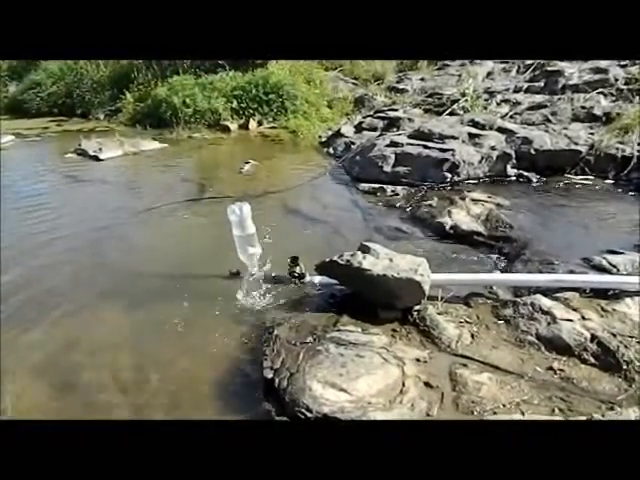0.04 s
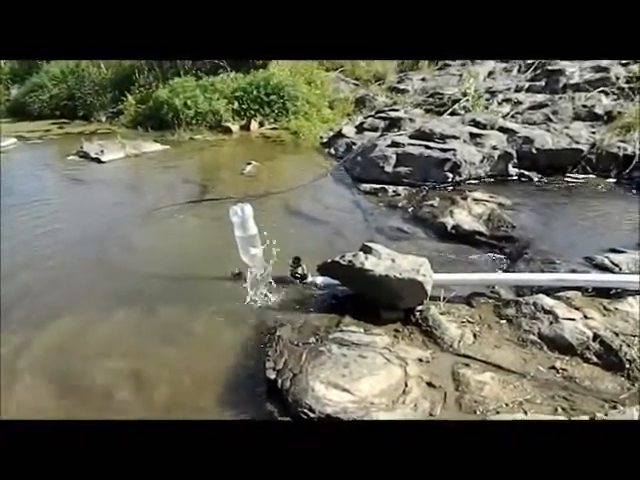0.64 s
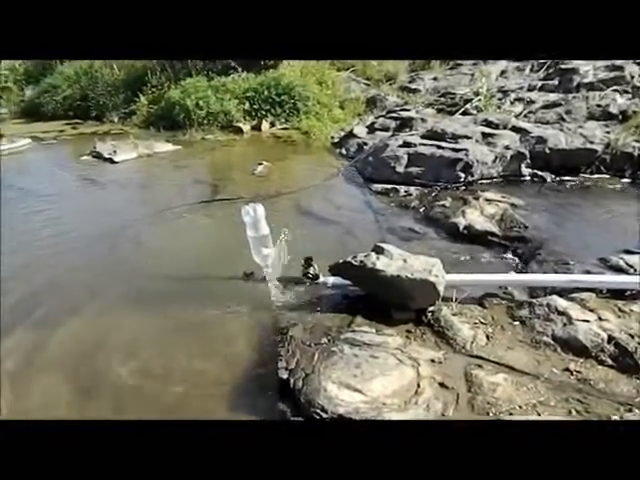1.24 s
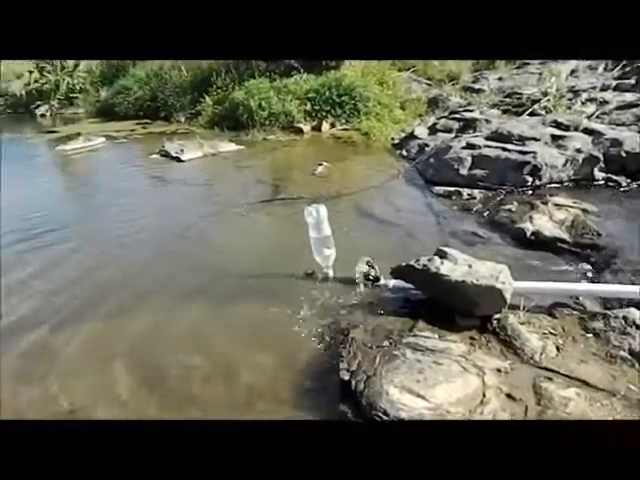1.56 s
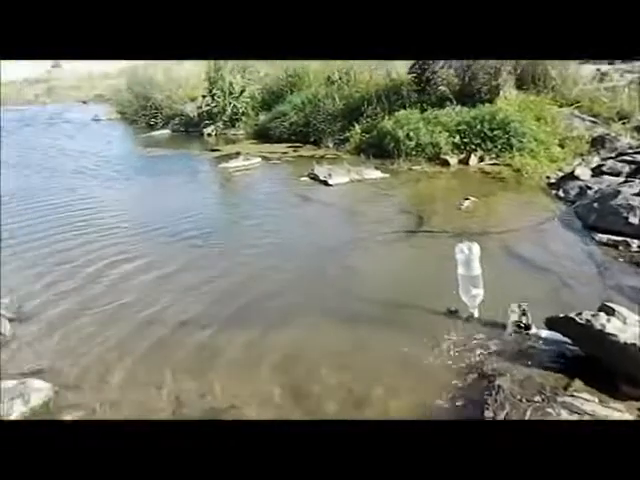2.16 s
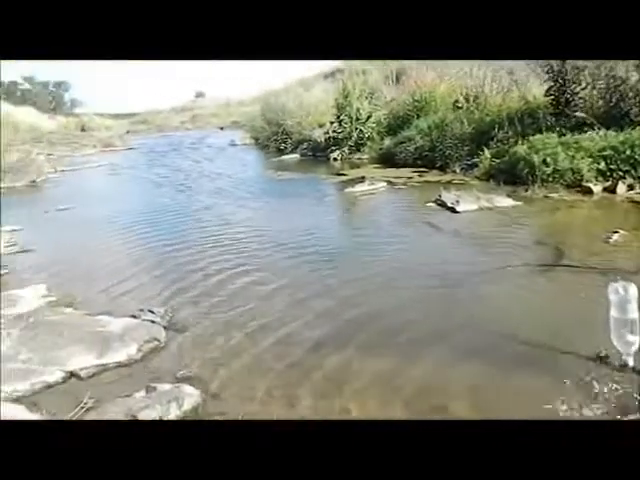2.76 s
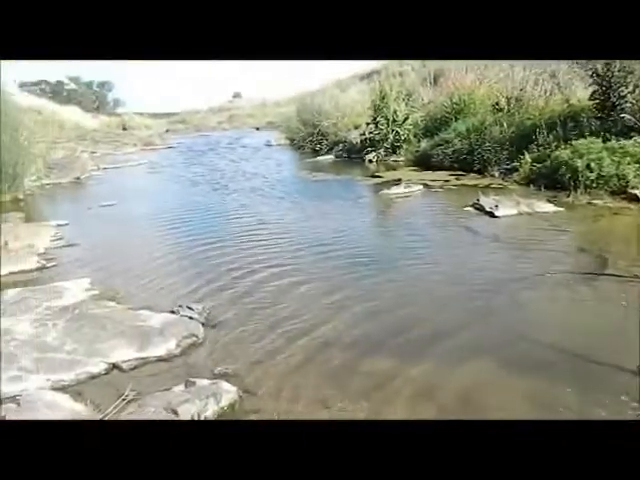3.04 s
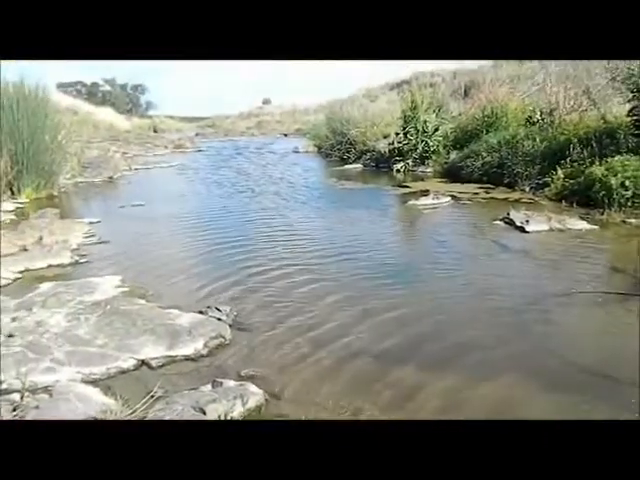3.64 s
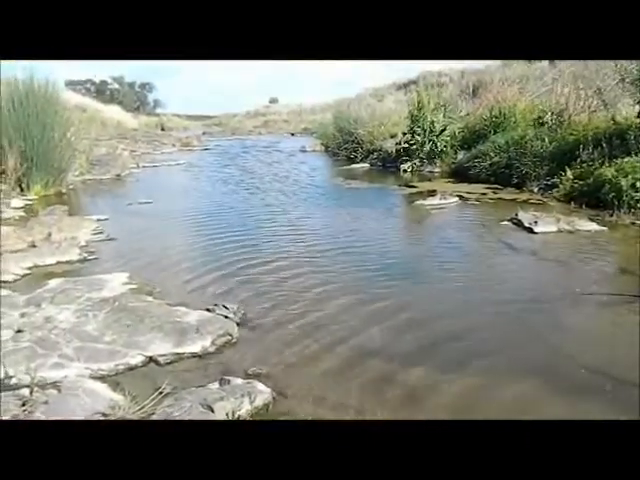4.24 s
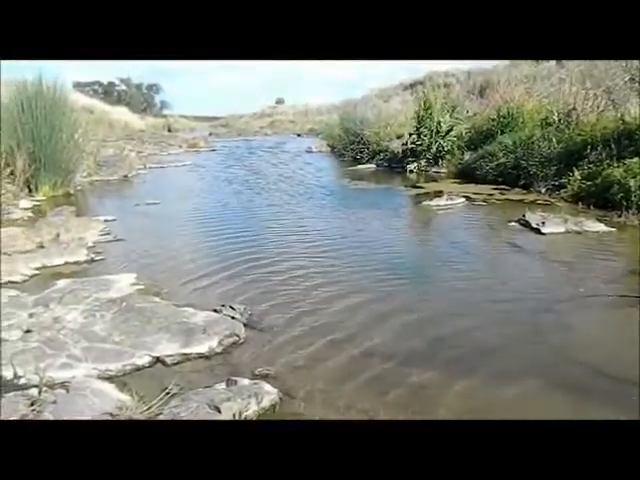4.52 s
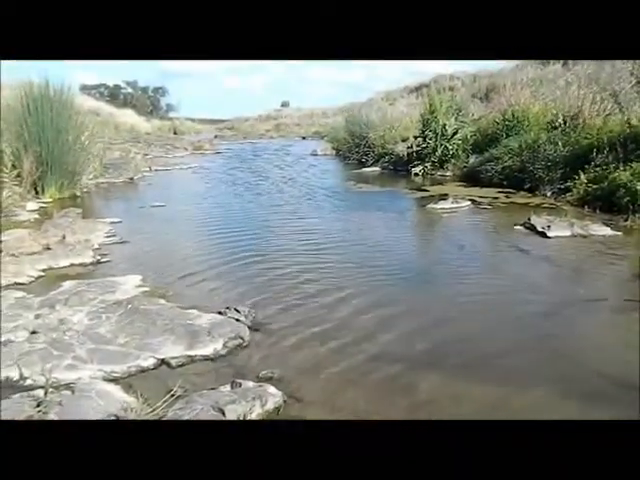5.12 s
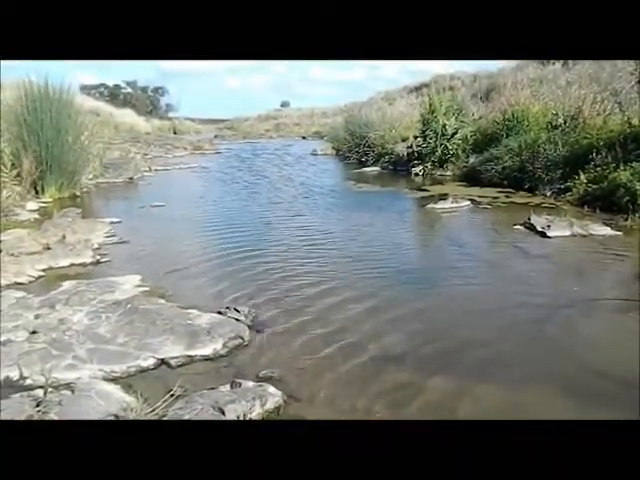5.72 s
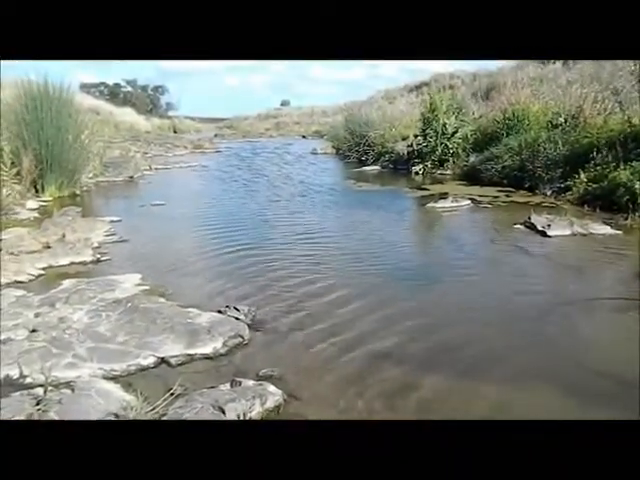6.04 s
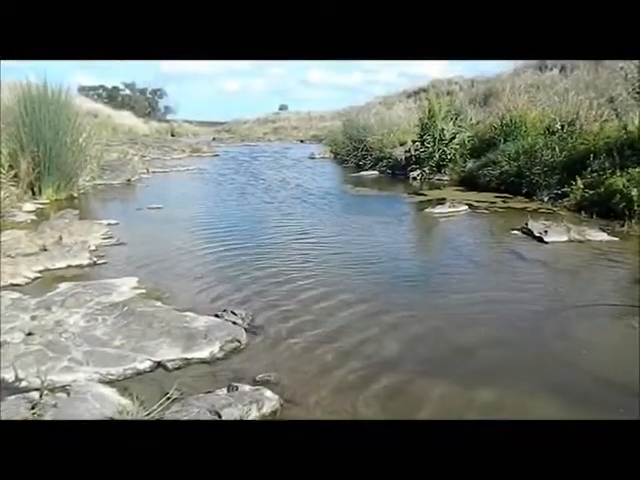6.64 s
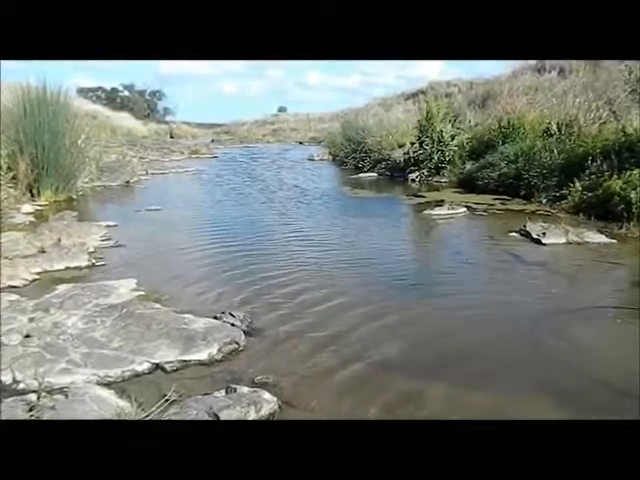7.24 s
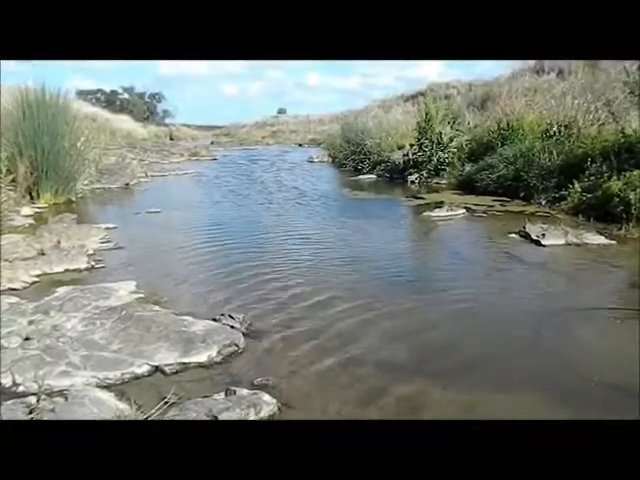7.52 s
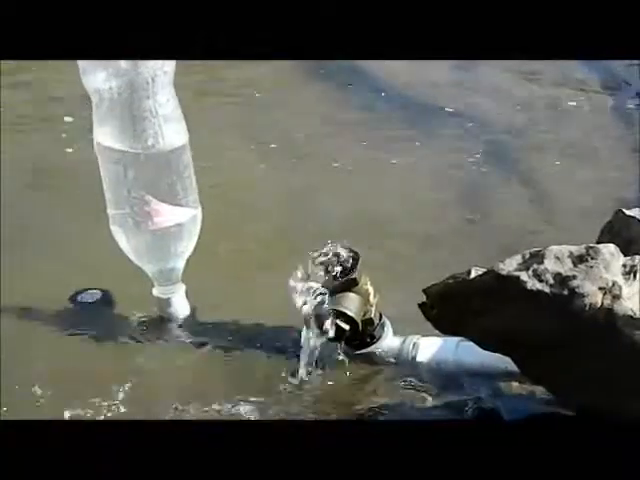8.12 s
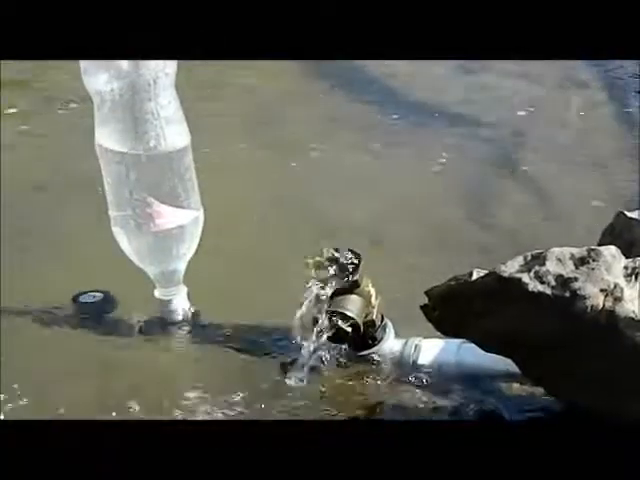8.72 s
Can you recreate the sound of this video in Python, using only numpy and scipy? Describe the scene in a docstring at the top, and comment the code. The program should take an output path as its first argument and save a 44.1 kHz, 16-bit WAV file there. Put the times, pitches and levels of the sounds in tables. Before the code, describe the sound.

A home-made water pump clacks steadily, about three times every two seconds, its metal valve slamming with a brief hiss and a knock in the pipe. Water spills into a creek pool after each stroke, bubbling and splashing softly. Wind thumps and rumbles on the microphone in uneven gusts, pushing the other sounds down. Late on, the sound drops out for an instant, then one last clack comes amid heavier wind.

```python
"""At a creek, a home-made water pump (a hydraulic ram) slams its brass valve shut about every 0.62 s.
Each slam stops the water in the pipe with a knock, and the valve drops open again with a faint tink.
Between slams, water spills from the valve and splashes into the pool, bubbling and dripping.
Gusts of wind rumble on the microphone and turn the whole sound down; late on, the level dips briefly."""
import sys
import numpy as np
from scipy import signal
from scipy.fft import rfft, irfft, next_fast_len
from scipy.io import wavfile
from scipy.ndimage import uniform_filter1d, map_coordinates

SR = 44100
rng = np.random.default_rng(int(sys.argv[2]) if len(sys.argv) > 2 else 0)


def inscribe(sig):
    """Save sig as 16-bit PCM at rate SR to the path in sys.argv[1].

    A 1-D sig is mono; a 2-D sig holds one channel per row.
    Samples are clipped to [-1, 1] before scaling.
    """
    pcm = np.round(np.clip(np.atleast_2d(sig).T, -1, 1) * 32767)
    wavfile.write(sys.argv[1], SR, pcm.astype(np.int16))


N = 396018

# each slam of the valve: (time [s], level [dB], extra level of the pipe's knock [dB], ping pitch [Hz])
SLAMS = [(0.568, -9.5, 1, 5470), (1.1897, -9, -18, 5450), (1.8118, -7, 3, 7200), (2.4429, -11.5, -27, 7060),
         (3.084, -12, 0, 7080), (3.715, -13, 4.5, 7150), (4.3384, -15.5, 6, 7400), (4.9585, -13, 5, 7080),
         (5.5776, -15.5, -13, 7300), (6.1945, -13, 5, 6370), (6.809, -11, 3, 7260), (7.4327, -13, 4, 7120),
         (8.3803, -14, 10, 5680)]


def valve(rise_s=0.0016, hold_s=0.0023, slam_db=-3, jet_db=-17, tail_db=-14, ping_db=-11):
    """Water hisses through the closing gap, the flap rattles shut and pings, and spray trails off."""
    jet_t60, tail_t60, ping_t60 = 0.095, 0.13, 0.017  # a t60 is the seconds taken to fade by 60 dB
    lead_s = 0.05  # the hiss starts before the flap hits
    t = np.arange(SR // 4) / SR - lead_s
    after = np.maximum(t, 0)
    blow = np.minimum(after / rise_s, 1) * np.exp(-(after / hold_s) ** 2 / 2)
    hiss = amp(np.where(t < 0, jet_db + 60 * t / jet_t60, tail_db - 60 * t / tail_t60))
    force, pings = np.zeros((2, N)), np.zeros(N)
    for s, db, _, ping_hz in SLAMS:
        common, across, left, right = rng.standard_normal((4, len(t)))
        # tanh makes the flap's bounces almost equally hard
        rattle = blow * (1.14 * np.tanh(2 * common) + 0.11 * np.array([across, -across]))
        jet = hiss * (np.array([left, right]) + 0.5 * common)
        add(force, s - lead_s, amp(db) * (rattle + jet))
        # the flap never lands the same way twice, so the ping's pitch varies
        ping = np.sin(2 * np.pi * ping_hz * after)
        add(pings, s - lead_s, amp(db + ping_db - 60 * after / ping_t60) * ping)
    brass_gain = np.sqrt(np.mean(np.abs(brass(np.linspace(0, SR / 2, 2048))) ** 2))
    return amp(slam_db) * filtered(force, brass) / brass_gain + pings * panned(-14)


# the tones the valve and pipe ring at: (pitch [Hz], width [Hz], level [dB], left minus right [dB])
BRASS_TONES = [(536, 220, -3, -2), (1040, 360, -1.5, 1.5), (1306, 150, 0, 5.5), (1600, 320, -2, -0.5),
               (2700, 256, 1.5, -0.5), (3010, 324, 3, -5), (3350, 306, 2, -4), (4035, 300, -2.5, -0.5),
               (5300, 490, -5, -4), (6000, 450, -5.5, -10.5), (6450, 590, -5, -11.5), (7300, 520, -1, -2),
               (8450, 340, -9, -8), (9320, 540, -6.5, -1), (11060, 600, -9.5, -6), (12020, 540, -4.5, 3),
               (12600, 750, -9, -7.5), (13803, 600, -13, 3), (15052, 600, -15.5, -5)]


def brass(hz):
    """The metal rings at its own tones: how strongly it passes each frequency, left and right."""
    response = 0
    for k, (pitch, width, db, pan_db) in enumerate(BRASS_TONES):
        resonance = 1j * hz * width / (pitch ** 2 - hz ** 2 + 1j * hz * width)
        response += (-1) ** k * amp(db) * panned(pan_db) * resonance
    return response


def water_hammer(knock_t60=0.03, round_trip_s=0.036, echo_db=-7, echo_t60=0.11, loss_db=4):
    """The suddenly stopped water knocks the pipe, and its pressure wave returns as three duller thuds."""
    t = np.arange(SR // 10) / SR
    onset = 1 - np.exp(-t / 0.0035)
    knocks, echoes = np.zeros((2, N))
    for s, db, knock_db, _ in SLAMS:
        add(knocks, s, amp(db + knock_db) * onset * burst(t, knock_t60))
        for k in range(3):
            thud = onset * burst(t, echo_t60)
            add(echoes, s + (k + 1) * round_trip_s, amp(db + echo_db - k * loss_db) * thud)
    return band(knocks, 850, 1690) + band(echoes, 317, 835)


def reopening(delay_s=0.203, ring_hz=5270, ring_db=-49, ring_t60=0.079):
    """As the pressure falls, the flap drops open with a faint brass tink."""
    t = np.arange(SR // 6) / SR
    tinks = np.zeros(N)
    for s, *_ in SLAMS:
        late, louder, detune = rng.standard_normal(3)
        ring = np.sin(2 * np.pi * (ring_hz + 15 * detune) * t) * (1 - np.exp(-t / 0.003))
        add(tinks, s + delay_s + 0.0074 * late, amp(ring_db + 2 * louder - 60 * t / ring_t60) * ring)
    return tinks * panned(-16)


# how loud the spilling water is: (time [s], babble level [dB], spray level [dB])
FLOW = [(0.0, -42.5, -52), (2.21, -44, -52.5), (2.34, -36, -47.5), (2.47, -49, -56.5), (3.77, -43, -54),
        (3.9, -44, -52.5), (4.03, -48, -57), (4.69, -46, -54.5), (5.08, -46.5, -57.5), (5.47, -49, -54),
        (5.6, -50, -56), (5.99, -48, -56.5), (6.12, -53, -58), (6.51, -43, -52.5), (6.64, -53.5, -60.5),
        (6.77, -48, -53.5), (7.03, -51, -58.5), (7.16, -44.0, -53.5), (7.42, -46.5, -56),
        (8.07, -44.5, -52.5), (8.2, -51.5, -56), (8.59, -43.5, -53.5), (8.85, -58.5, -62.5),
        (8.98, -48, -58)]
# the tone of the pool's soft wash and of the fine spray: (frequency [Hz], level [dB])
WASH_TONE = [(150, -36), (300, -15), (450, -8), (800, 2), (1250, -6.5), (1700, -1.5), (2200, -1.5),
             (3000, -4), (4200, -12.5), (7000, -24), (12000, -72)]
SPRAY_TONE = [(1500, 3), (3300, -6.5), (4500, -2), (5500, -1), (7200, 0), (8300, -2), (10500, -2.5),
              (12300, -3.5), (14000, -7.5), (15600, -11.5), (16500, -40)]


def spill(babble_db=0.5, spray_db=4, mist_db=3, gurgle_db=-9):
    """Spilled water stirs the pool into a babble of bubbles, wash and gurgles, with fine spray above."""
    babble_level, spray_level = curves(FLOW)
    flutter_db = 2.48 * wobble(35) + 1.07 * wobble(8)
    landing = landings()
    babble_gain = amp(babble_level + babble_db + flutter_db - 0.5 * landing)
    spray_gain = amp(spray_level + spray_db + flutter_db + 3 * landing)
    bubbles = [swarm(387.3, 3806, cycles=40.5, scatter_db=4.5, count=2400, size=1800) for _ in range(2)]
    gurgles = swarm(524, 3380, cycles=42, scatter_db=4, count=480, size=2200)
    fizz = [swarm(2800, 15000, cycles=14, scatter_db=4.6, count=7000, size=300) for _ in range(2)]
    bubbles = coloured(np.array(bubbles), [(380, -2.5), (800, -5), (3000, 2), (3800, -7)])
    gurgles = coloured(gurgles, [(520, -5), (900, 5), (2600, 1.5), (3300, -5)])
    wash = coloured(patchy(depth_db=3.5, size=512), WASH_TONE)
    babble = unit(spread(bubbles + wash)) + amp(gurgle_db) * gurgles
    mist = amp(mist_db) * patchy(depth_db=4, size=1024)
    spray = coloured(np.array(fizz) + mist, SPRAY_TONE)
    return babble_gain * unit(babble) + spray_gain * unit(spread(spray))


def landings(flight_s=0.28, width_s=0.023):
    """A curve that swells from 0 to 1 and back as the water thrown up by each slam comes down."""
    t = np.arange(N) / SR
    return sum(np.exp(-((t - s - flight_s) / width_s) ** 2 / 2) for s, *_ in SLAMS)


def bubble(t, hz, cycles, rise):
    """A bubble rings higher as it nears the surface, fading by 60 dB over the given cycles."""
    age = t * hz / cycles
    ring = np.sin(2 * np.pi * hz * t * (1 + rise * np.minimum(age, 1) / 2))
    return ring * amp(-60 * age) * (1 - np.exp(-2 * t * hz))


def swarm(low_hz, high_hz, cycles, scatter_db, count, size):
    """Many bubbles ring at random times and pitches, each for size samples."""
    when, pitch, strength, life = rng.random((count, 4)).T[:, :, None]
    hz = low_hz * (high_hz / low_hz) ** pitch
    gain = amp(-scatter_db * np.log(1 - 0.985 * strength))  # loud ones are rare
    rings = gain * bubble(np.arange(size) / SR, hz, cycles * (0.5 + life), rise=0.12)
    positions = (when * N).astype(int) + np.arange(size)
    return unit(np.bincount(positions.ravel(), rings.ravel(), minlength=N)[:N])


# the loudest bubbles, and the hardest drops on rock and pool: (time [s], level [dB], pitch [Hz])
BIG_BUBBLES = [(0.085, -25, 2000), (0.237, -18.5, 2540), (0.265, -22.5, 760), (0.477, -24.5, 660),
               (0.877, -22, 870), (1.522, -22, 2920), (2.275, -22.5, 1370), (3.224, -25, 2050),
               (3.325, -28, 1020), (3.388, -22.5, 910), (3.419, -24, 870), (3.564, -25.5, 707),
               (3.855, -25, 2310), (4.72, -24, 636), (4.895, -26.5, 573), (5.527, -24.5, 1190),
               (5.89, -27.5, 2470), (5.961, -29.5, 1590), (7.768, -32, 1250), (7.784, -27.5, 1450),
               (7.999, -23.5, 1570), (8.227, -24, 2150)]
HARD_DROPS = [(0.6826, -14, 2880), (0.7146, -31, 2540), (0.9158, -11.5, 5320), (1.317, -23.5, 2550),
              (2.006, -26, 3600), (2.2755, -23.5, 2700), (2.6414, -31, 5180), (2.7152, -32, 2480),
              (5.158, -32, 5300), (5.8618, -32.5, 4220), (6.3465, -33, 3170), (7.953, -32, 5130)]
# slops of water, most of it thrown up by a slam, a few stray: (time [s], level [dB])
WATER_SLOPS = [(0.845, -19), (0.8765, -17), (1.138, -25.5), (1.4995, -24), (2.1191, -23.5), (3.401, -25.5),
               (4.8955, -26), (5.2777, -22.5), (7.7485, -26.5), (8.0375, -28), (8.41, -24), (8.672, -21)]


def splashes(bubble_db=-2, slop_db=-7):
    """Single bubbles plop, hard drops smack and thrown water slops down, all louder than the babble."""
    t = np.arange(SR // 10) / SR
    plops, drops, slops = np.zeros(N), np.zeros(N), np.zeros((2, N))
    for s, db, hz in BIG_BUBBLES:
        plop = bubble(t, hz, cycles=45, rise=0.17) * (1 - np.exp(-t / 0.00038))
        add(plops, s, amp(db + bubble_db) * plop)
    for s, db, hz in HARD_DROPS:
        smack = 0.2 * burst(t, t60=0.011)
        add(drops, s, amp(db) * (bubble(t, hz, cycles=21, rise=0.055) + smack))
    for s, db in WATER_SLOPS:
        slop = np.array([burst(t, t60=0.082) for _ in range(2)]) * (1 - np.exp(-t / 0.003))
        add(slops, s, amp(db + slop_db) * slop)
    slops = shaped(slops, [(300, -20), (900, 6.5), (2500, 8.5), (5000, -3), (14000, -11.5)])
    drops = shaped(drops, [(6000, -1), (15000, -13)])
    return plops * panned(-1.1) + drops * panned(-5.5) + spread(slops)


def drips(drip_db=-13):
    """Stray drops tick on the rocks at random, louder when there is more spray."""
    ticks = swarm(2400, 5600, cycles=24, scatter_db=0.5, count=45, size=700)
    _, spray_level = curves(FLOW)
    return amp(spray_level + drip_db) * ticks * panned(-2)


# how alike the water sounds on the left and right: (frequency [Hz], likeness [0 to 1])
LIKENESS = [(300, .8), (640, 0.93), (1400, 0.78), (3100, 0.48), (6800, 0.07), (15000, 0.28)]
# which side the water is louder on: (frequency [Hz], left minus right [dB])
BALANCE = [(700, -0.5), (1300, -.5), (2400, -1.5), (4400, -6), (8100, -4.5), (13000, 0)]


def spread(pair):
    """Turn two unrelated signals into stereo water: alike in the bass, leaning right in the treble."""
    angle = lambda hz: np.arccos(along(LIKENESS, hz)) / 2
    mid, side = filtered(pair, lambda hz: np.array([np.cos(angle(hz)), np.sin(angle(hz))]))
    lean = lambda hz: amp(np.outer([0.5, -0.5], along(BALANCE, hz)))
    return filtered(np.array([mid + side, mid - side]), lean)


# the tone of the wind's low rumble, its roar and its swirls: (frequency [Hz], level [dB])
RUMBLE_TONE = [(20, -30), (40, -10), (55, -11), (70, 1.5), (95, 1), (130, -1), (170, -7), (230, -16),
               (320, -25.5), (700, -48), (1500, -120)]
ROAR_TONE = [(100, -27), (190, -5.5), (250, -4.5), (310, -6.5), (365, 3), (410, 3), (470, -4), (580, -10.5),
             (700, -18), (950, -28), (2000, -43), (4000, -120)]
SWIRL_TONE = [(20, -20), (50, 3), (100, 14), (150, 5), (250, -10), (320, -21), (400, -13.5), (520, -30.5),
              (760, -29), (1400, -34), (3300, -120)]


def wind(rumble_db=0.5, swirl_roar_db=-12, ragged_db=1.9, flutter_db=2.14, low_cut_hz=48):
    """Gusts push on both sides of the microphone together; swirls push the two sides opposite ways."""
    rumble_gain, roar_gain, swirl_gain = gusts()
    head_on, sideways = patchy(depth_db=2, size=2048)
    thumping = amp(flutter_db * wobble(40))  # breaks the roar into separate thumps
    roar, swirl_roar = unit(thumping * coloured(patchy(depth_db=2, size=512), ROAR_TONE))
    push = amp(rumble_db) * rumble_gain * coloured(head_on, RUMBLE_TONE) + roar_gain * roar
    swirl = swirl_gain * (coloured(sideways, SWIRL_TONE) + amp(swirl_roar_db) * swirl_roar)
    ragged = unit(amp(ragged_db * wobble(70)))  # tumbling air makes every gust uneven
    pressure = ragged * (push + np.array([swirl, -swirl]))
    # a small microphone picks up little of the deepest rumble
    return filtered(pressure, lambda hz: hz ** 2 / np.sqrt(hz ** 4 + low_cut_hz ** 4))


# each gust: (peak time [s], half-width [s], rumble level [dB], roar level [dB], swirl level [dB])
WIND_GUSTS = [(0.195, 0.096, -43.5, -63, -35.5), (0.961, 0.1, -38, -54, -34.0),
              (1.162, 0.074, -30, -44, -27), (1.458, 0.06, -38, -57, -33), (1.6, 0.08, -26.5, -37.5, -16.5),
              (1.735, 0.089, -18, -18, -63), (1.84, 0.073, -37.5, -44, -64), (2.306, 0.033, -27, -41, -20),
              (2.373, 0.067, -28.5, -27.0, -17), (2.83, 0.37, -42.5, -65, -34),
              (3.007, 0.03, -31, -65, -26), (3.121, 0.128, -42.5, -44.5, -35),
              (4.034, 0.032, -25, -33.5, -14), (4.344, 0.069, -36, -44, -29.5),
              (4.602, 0.052, -41.0, -53, -31), (4.667, 0.031, -26, -51, -60.0),
              (4.784, 0.093, -27.5, -37, -71), (5.378, 0.075, -30, -39, -16),
              (5.467, 0.041, -22.5, -27, -12), (5.605, 0.072, -31.5, -42, -47),
              (5.893, 0.025, -34.5, -48, -29), (5.996, 0.055, -30, -39.5, -19.5),
              (6.43, 0.038, -53.5, -51, -25), (6.578, 0.099, -18.5, -31, -79),
              (6.724, 0.078, -19, -30, -70), (6.799, 0.052, -25.5, -22, -63),
              (6.95, 0.036, -30.5, -50, -65), (7.144, 0.13, -42.0, -61, -36.5),
              (7.368, 0.062, -37, -50.5, -33), (7.511, 0.083, -43, -40, -36),
              (7.845, 0.13, -38.5, -49.5, -33), (7.998, 0.038, -26, -42, -21),
              (8.045, 0.025, -26, -32.5, -10), (8.149, 0.045, -21.5, -33, -17.5),
              (8.305, 0.056, -32.0, -18.5, -64), (8.349, 0.092, -21.5, -27.0, -68),
              (8.447, 0.12, -22.5, -24.5, -66), (8.677, 0.05, -15.5, -16.5, -68),
              (8.804, 0.055, -18.5, -19, -67), (8.947, 0.13, -33, -41, -67)]
# the light breeze between gusts: (time [s], level [dB])
LIGHT_BREEZE = [(0, -49), (0.5, -48.5), (0.8, -54), (1.3, -60), (2.0, -51.5), (2.6, -60.5), (3.0, -51),
                (3.5, -54.5), (4.4, -56), (5.1, -59), (5.8, -60), (6.2, -45), (6.4, -62), (7.0, -59),
                (7.7, -53.5), (8.98, -74)]


def gusts(waver_db=3, breeze_roar_db=-7, breeze_swirl_db=-3.5, slope_db=25):
    """Strength of rumble, roar and swirl as each gust swells and fades over a wavering breeze."""
    t = np.arange(N) / SR
    breeze_db = curves(LIGHT_BREEZE)[0] + waver_db * wobble(7)
    power = amp(breeze_db + np.array([[0], [breeze_roar_db], [breeze_swirl_db]])) ** 2
    for s, width, *levels_db in WIND_GUSTS:
        near = np.abs(t - s) < 4 * width
        # a rounded top, then sides that lose slope_db per half-width
        fade_db = slope_db * (np.hypot((t[near] - s) / width, 0.5) - 0.5)
        power[:, near] += np.outer(amp(levels_db), amp(-fade_db)) ** 2
    return np.sqrt(power)


# sudden puffs of wind: (time [s], level [dB])
WIND_PUFFS = [(1.137, -20), (4.018, -17), (4.79, -17.5), (5.325, -21.5), (5.468, -18.5), (5.979, -25),
              (8.037, -14.5), (8.644, -16.5), (8.777, -14)]


def puffs(puff_db=-3, top_hz=750):
    """Each sharp puff hits the microphone with a dull thump that dies fast."""
    t = np.arange(SR // 10) / SR
    onset = 1 - np.exp(-t / 0.0014)
    hits = np.zeros(N)
    for s, db in WIND_PUFFS:
        add(hits, s, amp(db + puff_db) * onset * burst(t, t60=0.034))
    return band(hits, 150, top_hz, order=3) * np.sqrt(SR / 2 / top_hz)


def amp(db):
    """Turn decibels into a gain to multiply by."""
    return 10 ** (np.asarray(db) / 20)


def unit(x):
    """Scale x to an average strength (rms) of 1."""
    return x / np.sqrt(np.mean(x ** 2) + 1e-20)


def along(points, hz):
    """Read between (frequency [Hz], value) points on a log frequency scale."""
    freqs, values = np.transpose(points)
    return np.interp(np.log(hz + 1), np.log(freqs + 1), values)


def curves(rows):
    """Turn each column after the time into one value per sample."""
    times, *columns = np.transpose(rows)
    return [np.interp(np.arange(N) / SR, times, column) for column in columns]


def wobble(rate):
    """A smooth curve through rate random points a second."""
    return map_coordinates(rng.standard_normal(int(N * rate / SR) + 4), [np.arange(N) * rate / SR])


def burst(t, t60):
    """Noise that fades by 60 dB in t60 seconds."""
    return amp(-60 * t / t60) * rng.standard_normal(len(t))


def patchy(depth_db, size):
    """Two unrelated noises whose strength drifts in patches of time and pitch; size samples a frame."""
    frames = signal.stft(rng.standard_normal((2, N)), nperseg=size)[2]
    patches = rng.standard_normal(frames.shape[1:])
    patches = uniform_filter1d(uniform_filter1d(patches, 3, axis=0), 3, axis=1)
    return signal.istft(frames * amp(depth_db * unit(patches)), nperseg=size)[1][:, :N]


def band(x, low_hz, high_hz, order=2):
    """Keep the part of x between two frequencies."""
    return signal.sosfilt(signal.butter(order, [low_hz, high_hz], "band", fs=SR, output="sos"), x)


def filtered(x, response):
    """Multiply each frequency in x by response(hz)."""
    size = next_fast_len(N + SR // 2)
    return irfft(rfft(x, size) * response(np.fft.rfftfreq(size, 1 / SR)), size)[..., :N]


def shaped(x, tone):
    """Filter x by a list of (frequency [Hz], level [dB]) points."""
    return filtered(x, lambda hz: amp(along(tone, hz)))


def coloured(x, tone):
    """Shape the tone of x and scale it to strength 1."""
    return unit(shaped(x, tone))


def panned(db):
    """Left and right gains, with the left louder by db."""
    return amp(np.array([[db], [-db]]) / 2)


def add(track, s, sound):
    """Mix a sound into the track at s seconds."""
    start = max(round(s * SR), 0)
    part = track[..., start:start + sound.shape[-1]]
    part += sound[..., :part.shape[-1]]


def scene():
    """Pump, water and wind together."""
    return valve() + water_hammer() + reopening() + spill() + splashes() + drips() + wind() + puffs()


def gain_control(x, threshold_db=-31, squeeze=0.44, response_s=0.088, bass_hz=600):
    """Strong rumble turns the whole sound down; it comes back as the gust passes."""
    bass = signal.sosfilt(signal.butter(2, bass_hz, fs=SR, output="sos"), x)
    keep = np.exp(-1 / (response_s * SR))
    power = signal.lfilter([1 - keep], [1, -keep], np.mean(bass ** 2, axis=0))
    return x * (1 + power / amp(threshold_db) ** 2) ** (-squeeze / 2)


# the brief dip in the whole sound: (time [s], level [dB])
LEVEL_DIP = [(7.885, -0.5), (7.905, -22), (7.922, -33), (7.94, -17), (7.951, 1)]


def record(dry, ceiling=0.48, top_hz=16200):
    """Gusts turn the sound down, peaks are rounded, the level dips briefly and the top treble is cut."""
    ducked = gain_control(dry)
    rounded = ducked / (1 + (ducked / ceiling) ** 4) ** (1 / 4)
    dipped = rounded * amp(curves(LEVEL_DIP)[0])
    return filtered(dipped, lambda hz: hz < top_hz)


dry = scene()
out = record(dry)
inscribe(out)
```